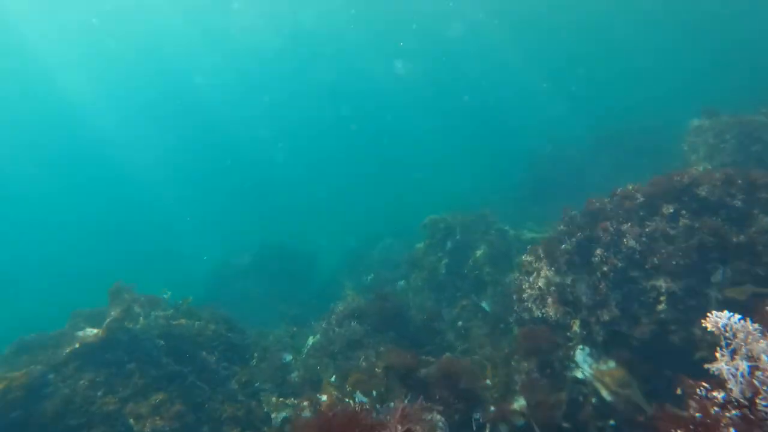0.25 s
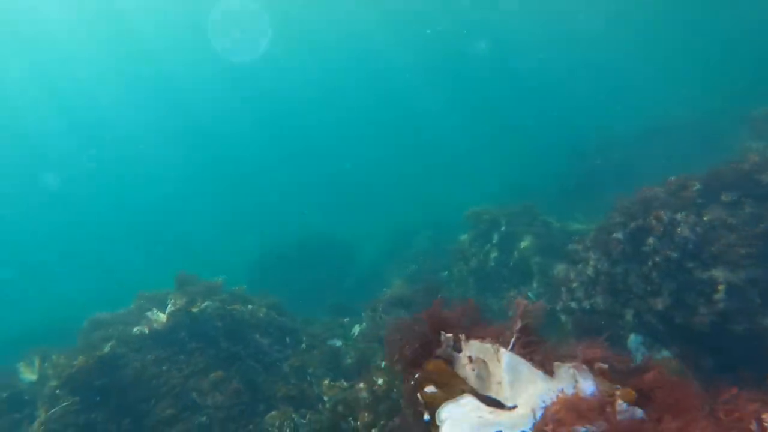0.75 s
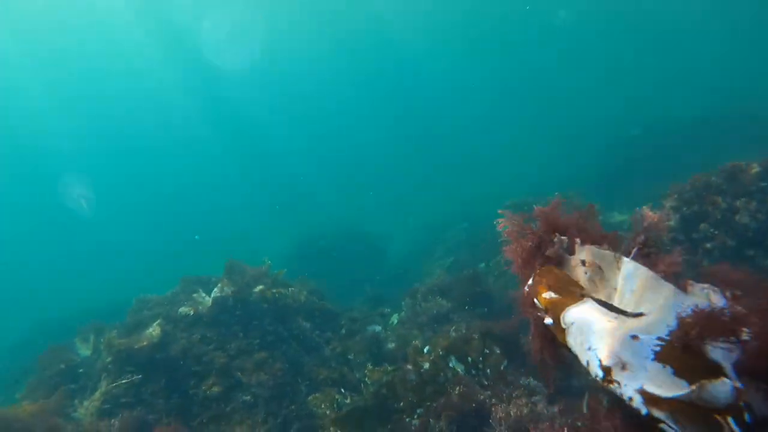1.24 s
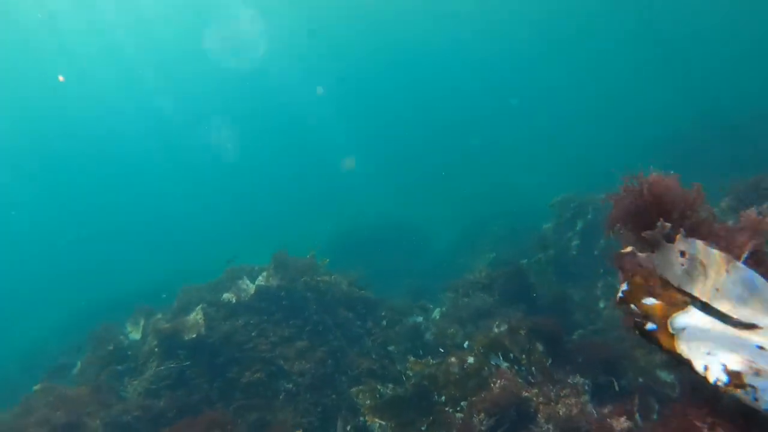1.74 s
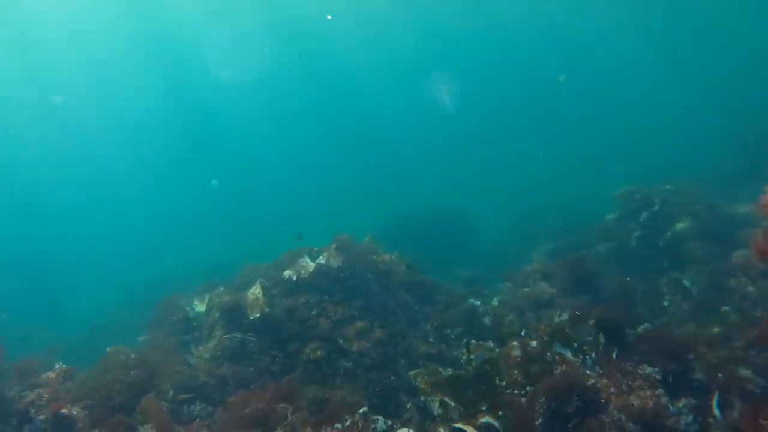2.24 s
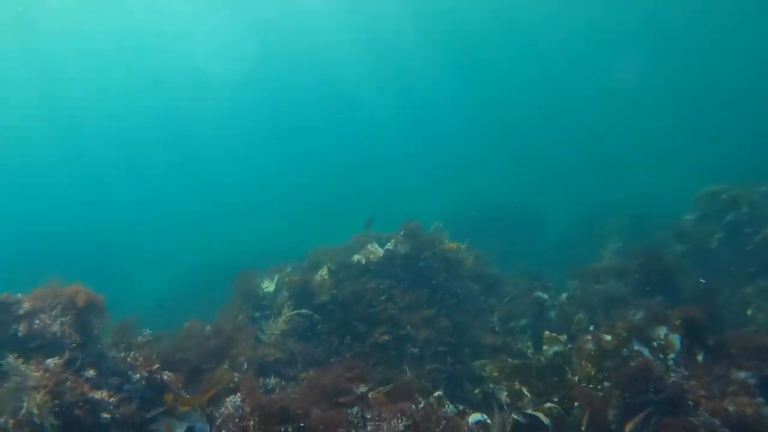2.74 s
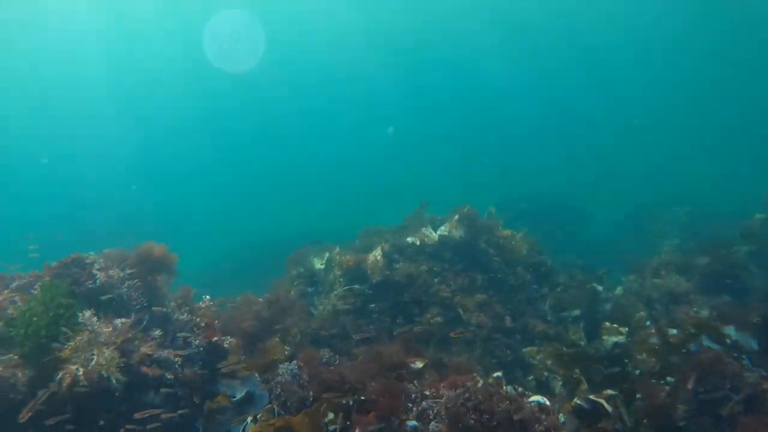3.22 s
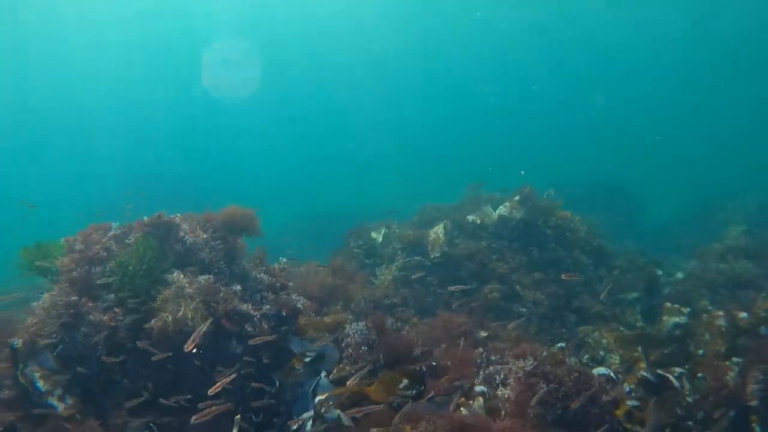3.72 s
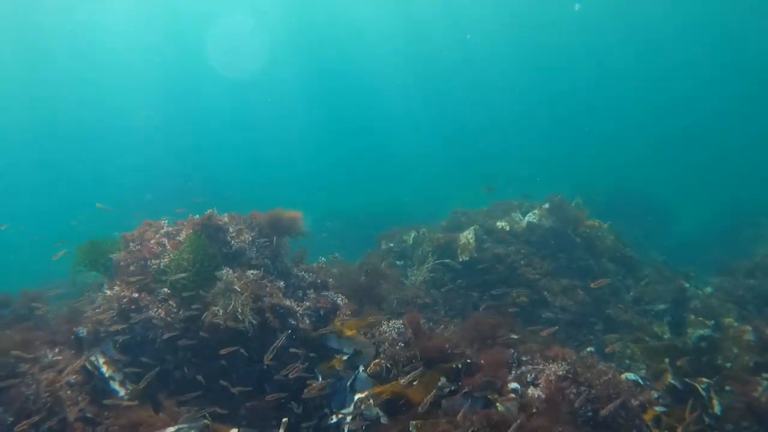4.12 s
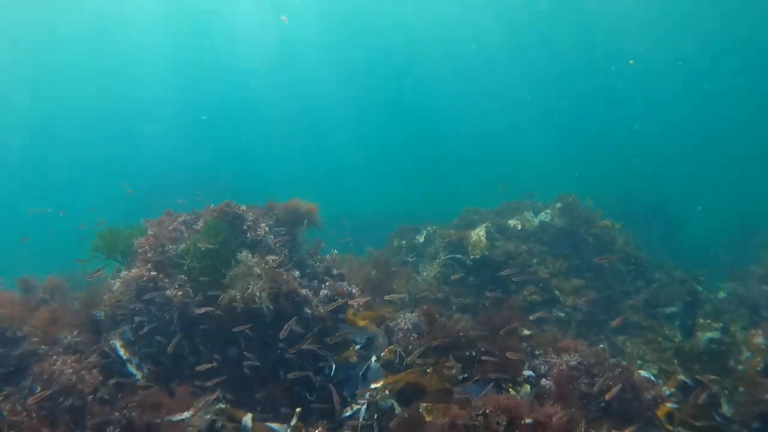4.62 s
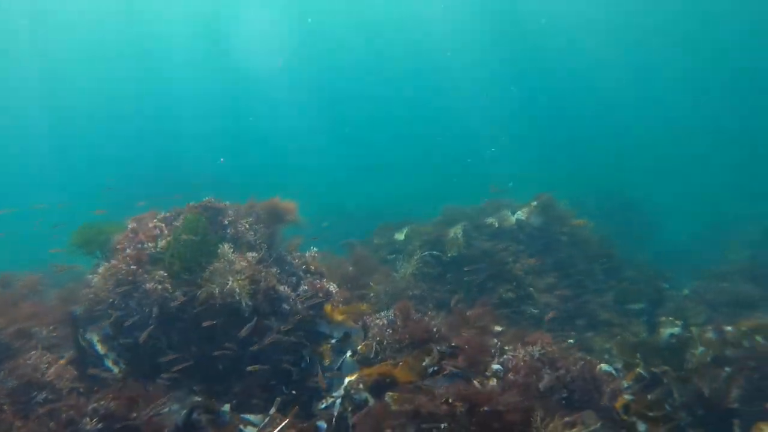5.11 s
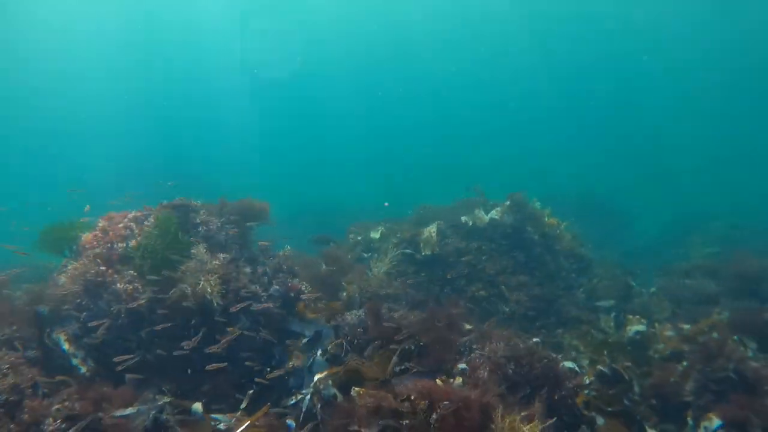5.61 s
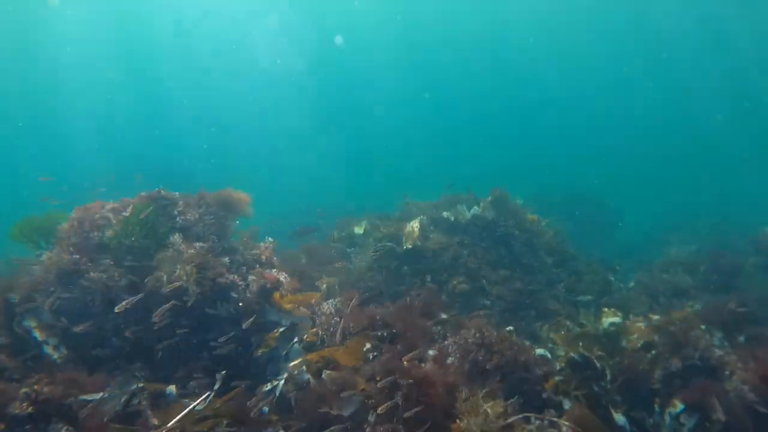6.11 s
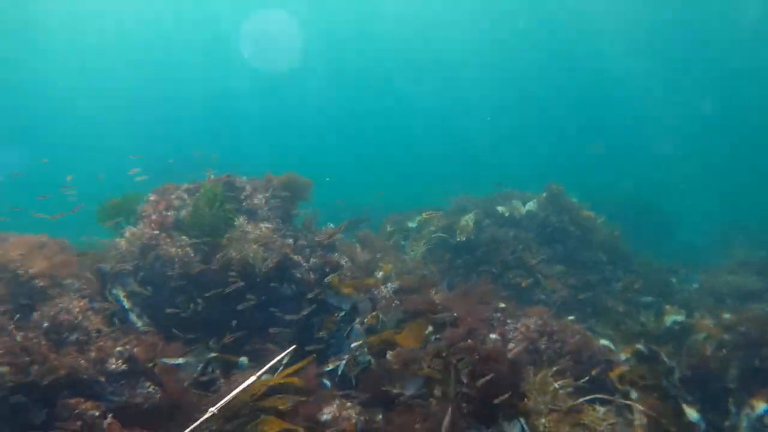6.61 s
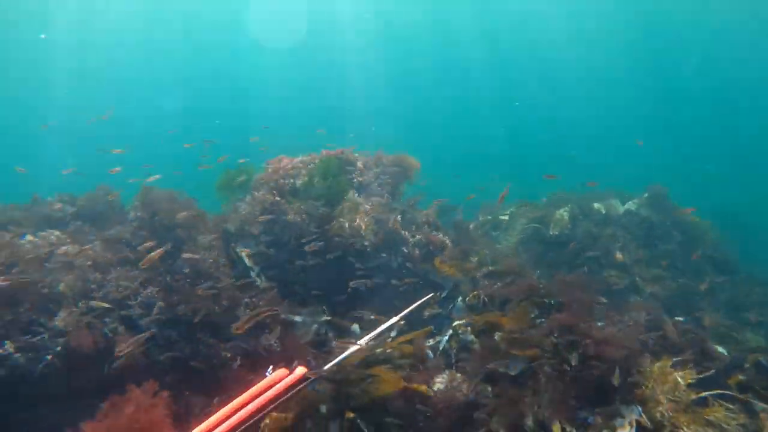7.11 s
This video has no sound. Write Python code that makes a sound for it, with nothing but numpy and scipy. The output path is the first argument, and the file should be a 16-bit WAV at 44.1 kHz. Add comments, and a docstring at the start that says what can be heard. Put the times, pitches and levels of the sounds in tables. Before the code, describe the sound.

A low, muffled wash of moving water surrounds a camera submerged over a reef, its microphone enclosed in a plastic housing. Gear and grit tap the housing at uneven intervals, with light ticks and about ten sharp knocks, the loudest coming early on and in a pair after the middle. Short bubble plinks and low gurgles come and go over a thin hiss of shrimp snaps. The water surges slightly at the close.

```python
"""Underwater over a reef, inside a drifting camera's sealed case. Water presses on the case as a low
rumble, slosh and gurgle; gear and grit tick against it and ring its plastic walls. Small bubbles
plink, near shrimp snap, and far ones blur into a crackling hiss under it all.
Two microphone ports in the case hear everything with different delay and colour."""
import sys
import numpy as np
from scipy import signal
from scipy.fft import rfft, irfft, next_fast_len
from scipy.io import wavfile
from scipy.ndimage import uniform_filter1d

SR = 44100
rng = np.random.default_rng(int(sys.argv[2]) if len(sys.argv) > 2 else 0)


def file_out(sig):
    """Save sig as 16-bit WAV at sys.argv[1]."""
    # one column per channel
    cols = np.atleast_2d(sig).T
    # limit, then scale
    lim = np.clip(cols, -1, 1)
    pcm = np.round(lim * 32767).astype(np.int16)
    wavfile.write(sys.argv[1], SR, pcm)


N = 324135


def gain_of(db):
    return 10 ** (np.asarray(db) / 20)


def unit_rms(x):
    return x / np.sqrt(np.mean(x ** 2) + 1e-20)


def unit_peak(x):
    return x / abs(x).max()


def at_hz(table, hz):
    knots_hz, values = np.transpose(table)
    return np.interp(np.log(hz + 1), np.log(knots_hz + 1), values)


def over_time(table, column):
    table = np.array(table)
    return np.interp(np.arange(N) / SR, table[:, 0], table[:, column])


def add(mix, start_s, sound):
    part = mix[round(start_s * SR):][:len(sound)]
    part += sound[:len(part)]


# Left port's phase lead: freq_hz, lead_rad
PORT_LEAD = [(20, 0), (150, -.25), (300, -.5), (750, -1.15), (1200, -1.3), (1700, -.9), (2800, -1.5),
             (4600, -.35), (7700, 0), (14000, 0)]
# Left port's level over the right: freq_hz, tilt_db
PORT_TILT = [(30, -1.8), (100, 0), (300, 1.2), (750, -1), (1200, -2.5), (1750, 0), (2700, 3.5), (4000, -1),
             (5500, -2), (9000, 1), (14000, 3)]
# Left-right likeness of diffuse sound: freq_hz, coherence_ratio
PORT_COHERENCE = [(30, 0.94), (200, 0.93), (1000, 1), (3000, 0.64), (6000, 0.82), (14000, 0.25)]


def ports(hz, spectrum, unrelated=None):
    """Spectra at the two ports; diffuse sound mixes an unrelated share into the right one."""
    right = spectrum
    if unrelated is not None:
        coherence = np.clip(at_hz(PORT_COHERENCE, hz), 0, 1)
        right = coherence * spectrum + np.sqrt(1 - coherence ** 2) * unrelated
    skew = gain_of(at_hz(PORT_TILT, hz) / 2) * np.exp(0.5j * at_hz(PORT_LEAD, hz))
    return np.array([spectrum * skew, right / skew])


def wash(spectrum, level_db, fft_size, patchy_db, flicker_db, steadiness=0.01):
    """Coloured stereo noise, patchy in time and pitch; steadiness evens out chance swells."""
    hop = fft_size // 4
    frames = N // hop + 9
    hz = np.fft.rfftfreq(fft_size, 1 / SR)[:, None]
    real, imag, patches = rng.standard_normal((3, 2, len(hz), frames))
    patches = uniform_filter1d(patches[0], fft_size // 100, axis=0)
    patches = unit_rms(uniform_filter1d(patches, 8, axis=1))
    flicker = unit_rms(uniform_filter1d(rng.standard_normal(frames), 3))
    colour = gain_of(at_hz(spectrum, hz) + patchy_db * patches + flicker_db * flicker)
    spectra = ports(hz, *(real + 1j * imag)) * colour
    _, noise = signal.istft(spectra, nperseg=fft_size, noverlap=fft_size - hop)
    noise = unit_rms(noise[:, fft_size:fft_size + N])
    power = uniform_filter1d(uniform_filter1d((noise ** 2).mean(0), fft_size), fft_size)
    return gain_of(level_db) * noise / (power + 0.051) ** (steadiness / 2)


# Push of the swell on the case: time_s, rumble_db
SWELL = [(0.0, -44), (0.18, -43), (1.06, -45.5), (1.6, -59), (1.7, -38), (2.07, -46), (3.03, -45),
         (3.11, -35.5), (3.25, -52), (3.28, -44.5), (3.5, -42.5), (3.64, -52), (3.7, -41.5), (5.02, -46.5),
         (5.57, -40.5), (5.63, -51.5), (6.06, -44), (6.39, -43), (6.41, -54), (6.49, -34), (6.57, -45),
         (6.71, -40.5), (6.94, -51), (7.35, -36.5)]
# Water moving past: time_s, slosh_db, churn_db
FLOW = [(0.0, -53, -61), (0.57, -57, -63), (0.88, -63.5, -62), (1.33, -54.5, -65), (1.64, -60.5, -64.5),
        (1.86, -50.5, -62), (2.13, -56, -65), (2.86, -60, -64.5), (3.19, -55.5, -65), (3.54, -64.5, -61),
        (3.72, -62.5, -63), (3.99, -54.5, -62), (4.28, -56.5, -57), (4.71, -62.5, -58), (4.83, -60, -55),
        (5.08, -59, -63), (5.49, -57, -63), (5.85, -61, -65), (6.55, -55, -63), (6.71, -51.5, -59),
        (7.12, -56.5, -63), (7.35, -49, -52)]
# Rumble colour: freq_hz, density_db
RUMBLE_SPECTRUM = [(7.1, -34.5), (12, 15.5), (23, 3.5), (40, 0), (57, -6), (86, -20.5), (100, -26.5),
                   (130, -45), (220, -120)]
# Slosh colour: freq_hz, density_db
SLOSH_SPECTRUM = [(41, -55), (70, -30), (97, 1), (182, -0.5), (291, -5), (356, -30), (450, -16), (580, -53),
                  (990, -120)]
# Churn heard through the walls: freq_hz, density_db
CHURN_SPECTRUM = [(180, -28), (300, -34), (368, -10), (649, -7.5), (757, -2), (1100, -11.5), (1430, -3.5),
                  (1760, 0.5), (2230, -16), (3500, -17), (4550, -44), (7700, -120)]


def water(churn_db):
    """Swell presses on the case as a rumble; passing water sloshes and churns."""
    swell_db = over_time(SWELL, 1)
    slosh_db = over_time(FLOW, 1) + 0.22 * (swell_db - swell_db.mean())
    rumble = wash(RUMBLE_SPECTRUM, swell_db, fft_size=4096, patchy_db=3, flicker_db=1, steadiness=0.61)
    slosh = wash(SLOSH_SPECTRUM, slosh_db, fft_size=2048, patchy_db=2, flicker_db=1.5, steadiness=0.1)
    churn = wash(CHURN_SPECTRUM, churn_db, fft_size=512, patchy_db=2.5, flicker_db=1.7)
    return rumble + slosh + churn


# Blurred far crackle: freq_hz, density_db
SIZZLE_SPECTRUM = [(1180, -12), (2000, -9), (2210, -9), (2870, -6.5), (3500, -4.5), (4100, -8.5),
                   (4950, -2.5), (7730, -7), (8680, -18.5), (11000, -27.5), (12200, -23.5), (13700, -46),
                   (14400, -42)]


def sizzle(churn_db):
    """Far crackle merges into a nearly steady hiss."""
    level_db = -68 + 0.12 * (churn_db - churn_db.mean())
    return wash(SIZZLE_SPECTRUM, level_db, fft_size=512, patchy_db=2.3, flicker_db=1.5)


def ring(modes, t):
    """Impulse response of modes; water damps each to a width of at least 140 Hz."""
    return sum(gain_of(db) * np.exp(-np.pi * max(width_hz, 140) * t) * np.sin(2 * np.pi * hz * t)
               for hz, width_hz, db in modes)


def scatter(modes, churn_db, rate_per_s, floor_db, spread_db, rise_s):
    """Random taps, denser in strong flow, each ringing three neighbouring modes; a few are large."""
    density = gain_of(0.88 * (churn_db - churn_db.mean()))
    strength = gain_of(floor_db + spread_db * np.minimum(rng.exponential(1, N), 4))
    hits = strength * (rng.random(N) < density * rate_per_s / SR)
    lowest_mode = rng.integers(0, len(modes) - 2, N)
    t = np.arange(1500) / SR
    taps = [ring(modes[k:k + 3], t) * (1 - np.exp(-t / rise_s)) for k in range(len(modes) - 2)]
    return sum(signal.oaconvolve(hits * (lowest_mode == k), tap)[:N] for k, tap in enumerate(taps))


# Case resonances: freq_hz, width_hz, level_db
CASE_MODES = [(271, 30, 24), (524, 37, -36), (760, 44, -20.5), (997, 540, 12), (1390, 388, 11),
              (1810, 43, 0.5), (2700, 450, 33)]
# Higher resonances of its thin pane: freq_hz, width_hz, level_db
PANE_MODES = [(3520, 1300, -16), (4380, 1200, -16), (4760, 333, 33.5), (5660, 240, 26), (6200, 216, 23),
              (7600, 193, 23), (9550, 1700, 14), (12400, 1300, -47)]
THUD_MODES, WALL_MODES = CASE_MODES[:2], CASE_MODES[1:-1]
UPPER_MODES = CASE_MODES[-1:] + PANE_MODES


def grit(churn_db):
    """Grit taps dully on the walls."""
    return scatter(WALL_MODES, churn_db, rate_per_s=140, floor_db=-69.5, spread_db=5.5, rise_s=0.00073)


def shrimp_crackle(churn_db):
    """Fine crackle of far snapping shrimp and thin dry snaps of nearer ones."""
    bright = [(hz, width_hz, 0.22 * db - 2.1 * np.log2(hz / 6000) ** 2)
              for hz, width_hz, db in UPPER_MODES]
    damped = [(hz, 2.9 * width_hz, -9 * np.log2(hz / 6000)) for hz, width_hz, _ in PANE_MODES[2:]]
    far = scatter(bright, churn_db, rate_per_s=220, floor_db=-83.5, spread_db=5.5, rise_s=0.00049)
    nearer = scatter(damped, churn_db, rate_per_s=48, floor_db=-74, spread_db=2, rise_s=0.0002)
    return far + nearer


def waver(cycles):
    """Four random sines, each a few bubble cycles long."""
    offsets = rng.random((4, 1))
    slow_cycles = np.arange(1, 5)[:, None] * cycles / 17
    return np.sin(2 * np.pi * (slow_cycles * (1 + offsets) + offsets[::-1])).sum(0)


def bubble(level_db, pitch_hz, t60_s, glide_ratio, rise_cycles, roughness=0.084):
    """An air pocket rings at one pitch, wobbles as the water squeezes it, glides and dies."""
    t60_s = np.clip(t60_s, 0.012, 0.3)
    t = np.arange(round(t60_s * SR)) / SR
    cycles = np.cumsum(pitch_hz * (1 + glide_ratio * t / t60_s)) / SR
    wobble_rad = 2.56 * roughness * waver(cycles)
    flutter = 1 + roughness * waver(cycles)
    attack = 1 - np.exp(-(cycles / rise_cycles) ** 2)
    envelope = gain_of(level_db - 60 * t / t60_s) * attack * flutter
    return envelope * np.sin(2 * np.pi * cycles + wobble_rad)


def fizz(rate_per_s=60):
    """Small bubbles at random moments, pitched near the wall modes."""
    out = np.zeros(N)
    for _ in range(round(rate_per_s * N / SR)):
        when, mode, detune, strength, length = rng.random(5)
        pitch_hz = WALL_MODES[int(mode * len(WALL_MODES))][0] * (1 + 0.132 * detune)
        level_db = -58 + 8.8 * strength ** 2
        t60_s = 0.017 + 0.077 * length
        add(out, when * N / SR, bubble(level_db, pitch_hz, t60_s, glide_ratio=-0.022, rise_cycles=1.42))
    return out


def pings(churn_db, rate_per_s=24):
    """Tiny bubbles near the first four upper modes, more of them in strong flow."""
    out = np.zeros(N)
    flow_total = np.cumsum(gain_of(2 * churn_db))
    for _ in range(round(rate_per_s * N / SR)):
        when, mode, detune, strength = rng.random(4)
        start_s = np.searchsorted(flow_total, when * flow_total[-1]) / SR
        pitch_hz = UPPER_MODES[int(mode * 4)][0] * (0.9 + 0.2 * detune)
        add(out, start_s, plink(-64.5 + 7 * strength ** 2, pitch_hz, glide_ratio=-0.05))
    return out


# Clearest bubbles: start_s, level_db, pitch_hz, glide_ratio
PLINKS = [(.228, -48, 760, -0.096), (.541, -49, 2620, -.05), (.649, -46, 2730, -0.19),
          (.754, -47, 800, 0.028), (.456, -35, 1810, -0.13), (0.516, -37.5, 1263, -.01),
          (.876, -42, 5240, -0.045), (0.88, -41, 4740, -0.091), (0.918, -39.5, 923, -0.012),
          (1.43, -38.5, 1940, -0.14), (1.726, -44, 3160, -0.0089), (1.867, -33, 1990, -0.27),
          (2.119, -43.5, 1466, -.05), (2.27, -46.5, 810, -0.0057), (2.658, -43.5, 790, -0.036),
          (2.718, -41.5, 1774, -0.085), (3.72, -44, 763, -0.082), (3.79, -49, 544, 0.058),
          (4.014, -43, 2390, .1), (4.026, -40, 2700, -0.097), (4.066, -44, 2700, -0.16),
          (4.102, -40.5, 1590, -0.099), (4.243, -40, 1800, -.06), (4.59, -44, 3110, -.05),
          (4.644, -40, 4720, -0.065), (4.645, -40, 2920, -.2), (4.709, -45.5, 853, 0.064),
          (4.718, -44, 2980, -.08), (4.732, -44, 2700, -0.056), (4.68, -30, 1585, .01),
          (4.76, -37, 1606, 0.024), (4.776, -32.5, 1407, 0.22), (4.805, -40, 808, -.03),
          (4.928, -41, 1440, -.05), (4.971, -40, 900, 0.0073), (5.279, -33, 740, -0.045),
          (5.314, -45, 1520, -.05), (5.675, -44, 4580, -.05), (6.725, -43.5, 1810, -0.096),
          (6.916, -30, 1433, .14), (7.197, -33, 760, -.05), (7.205, -44, 4630, -0.011),
          (7.224, -38, 2600, -.01), (7.255, -26, 1410, -0.32)]


def plink(level_db, pitch_hz, glide_ratio):
    """A bubble whose ring time follows its size: smaller, higher ones die sooner."""
    t60_s = 0.066 * (1000 / pitch_hz) ** 0.55
    return bubble(level_db, pitch_hz, t60_s, glide_ratio, rise_cycles=0.003 * pitch_hz, roughness=0.083)


# Water in the case's gaps: start_s, level_db, pitch_hz
GURGLES = [(.245, -38, 96), (.295, -37, 65), (.377, -33, 106.5), (.45, -37, 61.8), (.565, -37.5, 58.4),
           (.449, -36, 128), (1.013, -36, 137), (1.634, -36, 137), (1.851, -42, 158), (2.989, -35, 194),
           (3.186, -41.5, 99), (3.241, -37.5, 182), (3.739, -35.5, 460), (3.893, -43, 266),
           (4.049, -34, 160), (4.157, -35.5, 255), (4.185, -38, 172), (4.366, -35.5, 260),
           (4.953, -36.5, 172), (5.5, -38, 190), (5.528, -33, 206), (6.265, -26, 163), (6.316, -38, 203),
           (6.489, -43, 142), (6.543, -39, 201), (6.638, -39, 233), (6.773, -35, 152), (6.849, -36, 126),
           (7.001, -37, 142)]


def gurgle(level_db, pitch_hz):
    """A low bubble in a gap rises in pitch and dies in about 16 cycles."""
    return bubble(level_db, pitch_hz, t60_s=15.9 / pitch_hz, glide_ratio=0.16, rise_cycles=0.51)


# Blows on the case: start_s, level_db, pitch_hz, treble_db, bass_db, t60_s
TICKS = [(0.295, -41.5, 1590, -5.5, -17, .03), (0.382, -40.5, 1530, -10.5, -3, 0.054),
         (.681, -37.5, 580, -34, -7, 0.019), (.865, -38.5, 1620, -24, -22, 0.025),
         (.945, -15.5, 850, -22, -26, 0.043), (1.032, -42, 1430, -6.5, -20, .06),
         (1.069, -32.5, 1180, -16, -24, 0.067), (1.674, -9.5, 1420, -23, -30, 0.03),
         (1.699, -32, 1100, -10.5, -31, .04), (1.719, -23, 1230, -24.5, -40, 0.036),
         (1.743, -33, 1670, -16, -14, .05), (1.782, -45, 1810, -6, 3, 0.072),
         (1.882, -24.5, 820, -18, -11.5, 0.029), (2.032, -16.5, 740, -12.5, -11, 0.033),
         (2.436, -39, 1390, -19, -23, 0.052), (2.504, -19, 1190, -19, -11, 0.035),
         (2.998, -30, 1350, -19, -7.5, 0.088), (3.019, -30.5, 864, -13, -25, 0.037),
         (3.048, -39.5, 805, -5.5, -8, 0.18), (3.202, -37.5, 1200, -12.5, -27, 0.04),
         (3.377, -18, 1220, -11.5, -10, 0.033), (3.423, -33.5, 745, -33, -20, 0.057),
         (3.58, -39.5, 1320, -16, -3, .02), (3.904, -44.5, 1580, -4.5, -2, 0.033),
         (4.039, -39.5, 1700, -0.5, -11, 0.071), (4.293, -42.5, 1170, -21, -15, 0.13),
         (4.443, -37, 820, -14, -17, 0.074), (4.502, -26, 870, -11, -20, 0.038),
         (4.626, -29, 1590, -8.5, -37, 0.026), (4.686, -44, 1950, 2, -34, 0.045),
         (4.786, -37.5, 850, -3, -16, 0.011), (4.882, -20, 615, -22, -8, 0.027),
         (5.006, -33.5, 1560, -10, -12, 0.061), (5.289, -10, 700, -13.5, -11, 0.021),
         (5.589, -33, 840, -19, -12.5, 0.068), (5.735, -10.5, 1090, -24, -40, 0.024),
         (5.793, -41.5, 1390, -12, -24, 0.045), (6.043, -45.5, 2430, 1.5, -24, .025),
         (6.067, -42, 1660, -4.5, -20, 0.075), (6.107, -32.5, 990, -15, -10, 0.041),
         (6.35, -38.5, 1260, -13, -4, 0.06), (6.544, -34.5, 1290, -18, -15, .035),
         (6.593, -18.5, 900, -6.5, -13.5, 0.018), (6.832, -16, 1420, -13.5, -36, 0.024),
         (6.939, -34, 1610, -9.5, -6.5, 0.026), (7.039, -41.5, 1810, -14, -23, .035),
         (7.123, -37, 2500, 0.5, -17, .025), (7.145, -35, 820, -17, -6, 0.12),
         (7.237, -27.5, 1370, -12.5, -12, 0.035), (7.292, -29, 1730, -15.5, -9, 0.036),
         (7.327, -33, 790, -27, -21, 0.03)]


def tick(level_db, pitch_hz, treble_db, bass_db, t60_s):
    """A soft blow and its fading rattle ring the case; the blow's pitch picks the modes that speak."""
    noise = rng.standard_normal(3000)
    t = np.arange(len(noise)) / SR
    t60_s = np.clip(t60_s, 0.012, 0.15)
    shudder = gain_of(-16.5 - 60 * t / (3.5 * t60_s))
    fade = gain_of(-60 * t / t60_s) + shudder
    rattle = 0.11 * noise * (1 - np.exp(-t / 0.00066)) * fade
    blow = rattle.copy()
    blow[30] += 0.9

    ring_t = t[:len(t) // 2]
    struck = [(hz, width_hz, db - 18.7 * np.log2(hz / pitch_hz) ** 2)
              for hz, width_hz, db in WALL_MODES[1:]]
    wall = thick_wall(blow, struck + [(pitch_hz, 300, -1)], ring_t)
    thud = thick_wall(blow, THUD_MODES, ring_t)

    upper = np.array(UPPER_MODES, float)
    upper[:, 2] += 2.5 * noise[::-1][:len(upper)]  # random mode levels
    upper[0, 2] -= 0.37 * (level_db + 25)  # light ticks favour the lowest upper mode
    pane_ring = (1 - np.exp(-(ring_t / 0.0001) ** 2)) * ring(upper, ring_t)
    pane_drive = rattle * fade ** 0.37 + 0.13 * blow  # the thin pane settles sooner
    pane = unit_peak(signal.fftconvolve(pane_drive, pane_ring))
    return gain_of(level_db) * (wall + gain_of(treble_db) * pane + gain_of(bass_db) * thud)


def thick_wall(blow, modes, t, rise_s=0.00052, cutoff_hz=2000):
    """A struck wall takes a moment to swing up and passes little treble."""
    attack = 1 - np.exp(-(t / rise_s) ** 2)
    lowpass = signal.butter(6, cutoff_hz, fs=SR, output="sos")
    response = signal.sosfilt(lowpass, attack * ring(modes, t))
    return unit_peak(signal.fftconvolve(blow, response))


# Nearest shrimp: start_s, level_db, pitch_hz
SNAPS = [(0.4978, -51, 7200), (0.6135, -55, 7120), (0.726, -55, 5700), (1.6332, -48, 5550),
         (2.1884, -52, 5130), (2.2538, -63, 4760), (2.2982, -50.5, 4900), (2.3441, -58, 7200),
         (2.6363, -54, 7160), (2.7412, -52, 7350), (2.8444, -55.5, 6860), (2.8948, -54, 7550),
         (3.2964, -54, 7250), (3.5299, -57, 6970), (3.8566, -60, 4840), (4.0934, -60, 7100),
         (4.1774, -57, 7160), (4.5904, -57, 7500), (4.6706, -42.5, 6600), (4.7914, -63, 7040),
         (4.8354, -61, 7800), (5.148, -55, 7000), (5.6914, -49.5, 5540), (5.725, -53, 4930),
         (6.0087, -54, 4800), (6.6802, -57, 5750), (6.788, -52, 5700), (6.8814, -51, 5030),
         (6.9197, -53, 7100), (7.1656, -54, 7600), (7.3044, -50, 4790)]


def shrimp_snap(level_db, pitch_hz, t60_s=0.013, rise_s=0.00079, half_width_oct=0.18):
    """A very short puff of noise in a band around its pitch."""
    t = np.arange(900) / SR
    puff = rng.standard_normal(len(t)) * gain_of(-60 * t / t60_s) * (1 - np.exp(-t / rise_s))
    edges_hz = pitch_hz * 2 ** np.array([-half_width_oct, half_width_oct])
    bandpass = signal.butter(2, edges_hz, "band", fs=SR, output="sos")
    return gain_of(level_db) * unit_peak(signal.sosfilt(bandpass, puff))


def scene():
    """Taps, bubbles and snaps reach both ports over the diffuse water noise."""
    churn_db = over_time(FLOW, 2)
    direct = grit(churn_db) + shrimp_crackle(churn_db) + fizz() + pings(churn_db)
    for table, source in (TICKS, tick), (PLINKS, plink), (GURGLES, gurgle), (SNAPS, shrimp_snap):
        for start_s, *settings in table:
            add(direct, start_s, source(*settings))
    fft_size = next_fast_len(N + SR)
    spectra = ports(np.fft.rfftfreq(fft_size, 1 / SR), rfft(direct, fft_size))
    return irfft(spectra, fft_size)[:, :N] + water(churn_db) + sizzle(churn_db)


def record(dry):
    """Steep band limit on the treble."""
    cutoff_hz = 14300
    lowpass = signal.firwin(255, cutoff_hz, window=("kaiser", 9), fs=SR)
    padded = np.pad(dry, ((0, 0), (127, 127)), "edge")
    return signal.oaconvolve(padded, lowpass[None], "valid", axes=1)


dry = scene()
out = record(dry)
file_out(out)
```